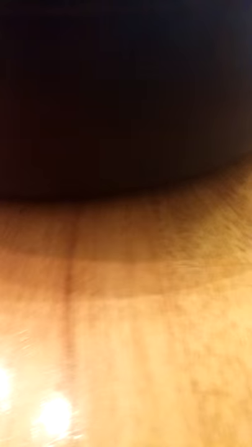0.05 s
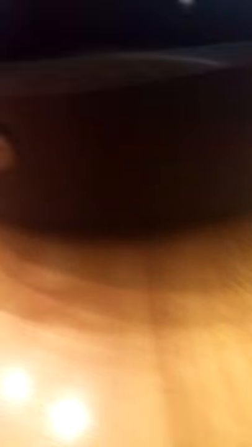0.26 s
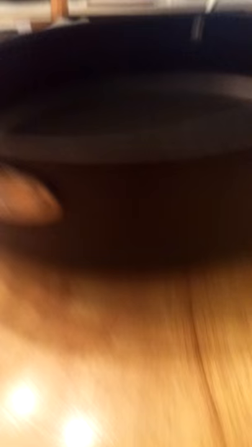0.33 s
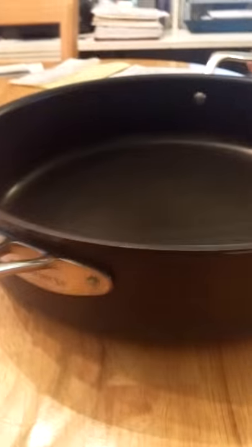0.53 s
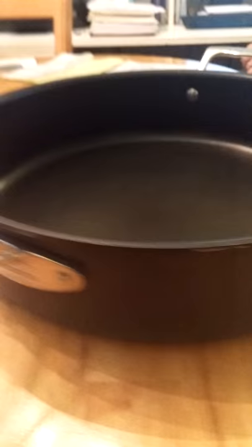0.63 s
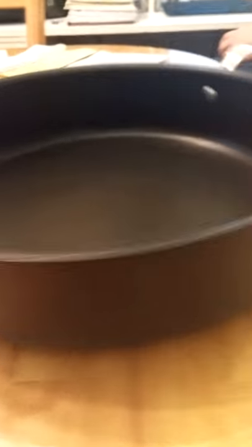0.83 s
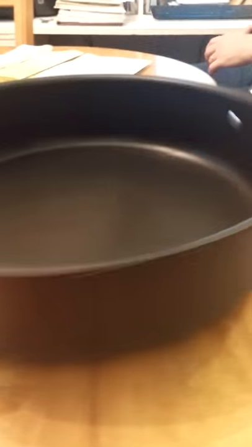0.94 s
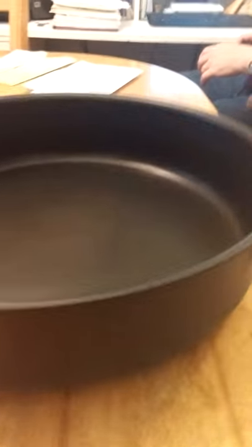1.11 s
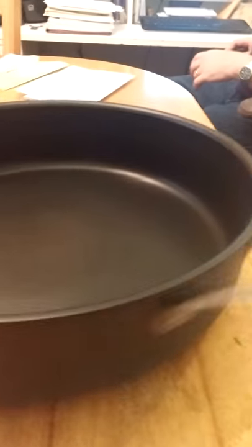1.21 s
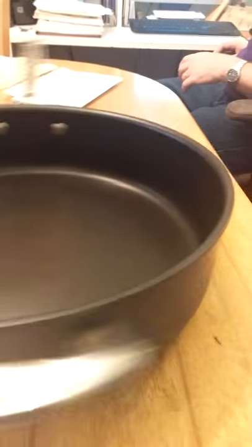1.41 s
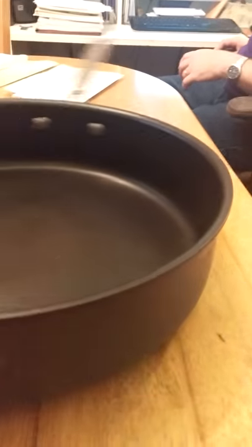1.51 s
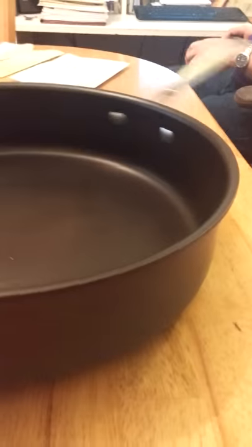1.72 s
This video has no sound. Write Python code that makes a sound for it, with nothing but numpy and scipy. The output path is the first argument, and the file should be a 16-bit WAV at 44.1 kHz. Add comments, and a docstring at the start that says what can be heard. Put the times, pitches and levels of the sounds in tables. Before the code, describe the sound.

Close up in a small room, a metal pan clunks against a wooden tabletop three times, its edge hitting and its base clapping flat. Then it is dragged round with a hissing rasp, a brief judder and faint metallic squeaks.

```python
"""Frying pan on a wooden table

A heavy pan rocks on a table in a small room, close to a stereo microphone. Three times its edge
knocks the wood and the base then claps down flat with a hollow ring, shaking the table top.
Then it is turned: the base scrapes over the grain in countless tiny catches and judders on the way."""
import sys
import numpy as np
from scipy import signal
from scipy.fft import rfft, irfft
from scipy.io import wavfile
from scipy.ndimage import uniform_filter1d, map_coordinates

SR = 44100
rng = np.random.default_rng(int(sys.argv[2]) if len(sys.argv) > 2 else 0)


def unload_audio(sound):
    """Save the sound as a 16-bit wav file, at the path given as the first command line argument."""
    columns = np.transpose(np.atleast_2d(sound))
    # keep every value between -1 and 1, then stretch to whole-number steps
    steps = np.round(np.clip(columns, -1, 1) * 32767)
    wavfile.write(sys.argv[1], SR, steps.astype(np.int16))


N = 77175
TIME = np.arange(N) / SR
FREQS = np.arange(N // 2 + 1) * SR / N


def undb(db):
    """Decibels to gain."""
    return 10 ** (np.asarray(db) / 20)


def unit(x):
    """Scale to rms 1."""
    return x / np.sqrt(np.mean(x ** 2))


def at_hz(table, hz, column=1):
    """Read a column of a table along log frequency."""
    rows = np.array(table, float)
    return np.interp(np.log(hz + 1e-9), np.log(rows[:, 0]), rows[:, column])


def at_time(table, column=1):
    """Read a column of a table along time."""
    rows = np.array(table, float)
    return np.interp(TIME, rows[:, 0], rows[:, column])


def colour(x, table):
    """Filter by (Hz, dB) points."""
    return irfft(rfft(x) * undb(at_hz(table, FREQS)), N)


def balance(db):
    """Channel gains for a balance, which is left minus right in dB."""
    return undb(np.array([[1], [-1]]) * db / 2)


def stereo_pair(noises, likeness):
    """Mix two unrelated noises into left and right of a given likeness per frequency."""
    mid, side = rfft(noises)
    alike = np.clip(likeness, 0, 1)
    return irfft(mid * np.sqrt((1 + alike) / 2) + side * np.sqrt((1 - alike) / 2) * [[1], [-1]], N)


def through(x, response):
    """Convolve with an impulse response."""
    return signal.fftconvolve(np.atleast_2d(x), np.atleast_2d(response), axes=1)[:, :N]


def fade(t60, start=0):
    """Exponential decay from a start time."""
    age = TIME - start
    return (age >= 0) * np.exp(-np.log(1000) * np.abs(age) / t60)


def swell(centre, width):
    """Bell-shaped envelope."""
    return np.exp(-((TIME - centre) / width) ** 2 / 2)


def wander(hz):
    """Smooth random motion of rms 1."""
    hold = max(int(SR / hz), 2)
    return unit(uniform_filter1d(rng.standard_normal(N)[np.arange(N) // hold], hold))


def ring(modes):
    """Impulse response of a set of damped modes."""
    return sum(balance(lr) * undb(db) * fade(t60) * np.sin(2 * np.pi * hz * TIME)
               for hz, db, t60, lr in modes)


def pushes(contacts):
    """One smooth force pulse per contact; a longer contact is duller."""
    force = np.zeros(N)
    for start, db, ms in contacts:
        age = np.maximum(TIME - start, 0) / (ms / 1000 / 2)
        pulse = age * np.exp(-age)
        force += undb(db) * pulse / pulse.sum()
    return force


def radiate(x, low_hz):
    """A small surface radiates its lows poorly."""
    return signal.sosfilt(signal.butter(2, low_hz, "high", fs=SR, output="sos"), x)


# The quiet of the room. Each row: frequency in Hz, relative level in dB.
ROOM_TONE = [(25, -14), (68, -4.5), (110, -5), (200, -3), (600, -12.5), (1500, -16.5), (3000, -25),
             (10000, -21), (13000, -26), (16000, -42)]
def room_tone():
    """A faint, low wash of noise all around the microphone."""
    noise = stereo_pair(rng.standard_normal((2, N)), at_hz(ROOM, FREQS, column=3))
    return undb(-62.5) * unit(colour(noise, ROOM_TONE))


# The small room. Each row: frequency in Hz, tail gain in dB, t60 in seconds, channel likeness 0-1.
ROOM = [(60, -14.5, .5, 0.5), (173, -11.5, 0.81, 1), (290, 5.5, 0.33, 0.7), (450, -5.5, 0.3, .5),
        (715, -7.5, 0.26, 1), (1500, -6.5, 0.34, 0), (4000, -1, 0.36, 0.7), (12000, -11, 0.66, 0)]
def reverb(x):
    """Quick reflections from nearby things, then a short tail in half-octave bands."""
    noise = rfft(stereo_pair(rng.standard_normal((2, N)), at_hz(ROOM, FREQS, column=3)))
    first_echo_s = 0.002
    early = fade(0.022, first_echo_s)
    early = undb(-13) * early / np.linalg.norm(early)
    response = 0
    for centre in 44 * 2. ** (np.arange(18) / 2):
        octaves_off = np.abs(np.log2((FREQS + 1e-9) / centre))
        band = irfft(noise * np.maximum(1 - 2 * octaves_off, 0), N)
        tail = fade(at_hz(ROOM, centre, column=2), first_echo_s)
        response += band * undb(at_hz(ROOM, centre)) * np.hypot(tail / np.linalg.norm(tail), early)
    return through(x, response)


# The nearest walls. Each row: delay in seconds, gain in dB, balance in dB.
WALLS = [(.0095, -20, -7.5), (0.0204, -9.5, 9)]
def wall_echoes(x):
    """Distinct reflections that have lost their treble."""
    dull = signal.sosfilt(signal.butter(2, 607, fs=SR, output="sos"), x)
    return sum(balance(lr) * undb(db) * [np.interp(TIME - delay, TIME, side, left=0) for side in dull]
               for delay, db, lr in WALLS)


# The pan's lean at the microphone. Each row: frequency in Hz, balance in dB.
TREBLE_BALANCE = [(500, -2), (1000, -4), (1800, -7.5), (2500, -6.5), (3300, 2.5), (4000, 0), (4900, -6),
                  (7000, -7.5), (10200, -10.5), (13000, 2.5)]
def lean_right(x):
    """The right side hears more of the treble."""
    return irfft(rfft(x) * balance(at_hz(TREBLE_BALANCE, FREQS)), N)


# The pan's resonances under friction. Each row: frequency in Hz, width in Hz, gain in dB.
PAN_RESONANCES = [(634, 39, 5.5), (1044, 70, 0), (1300, 160, 1), (1514, 53, 4), (2118, 61, 5.5),
                  (2876, 104, 1.5), (5520, 180, -2), (6580, 63, 4), (9970, 160, 4)]
# Stereo width of the friction. Each row: frequency in Hz, channel likeness 0-1.
FRICTION_LIKENESS = [(200, 0.91), (700, 0.63), (2000, 0.62), (4000, 0.31), (10000, 0.19)]
def friction(tone, grains_per_s=7000, spread_db=0.5):
    """Dense tiny catches of metal on wood, heard through the pan's resonances."""
    hits = rng.random((2, N)) < grains_per_s / SR
    grains = hits * rng.standard_normal((2, N)) * undb(spread_db * rng.exponential(size=(2, N)))
    hz = FREQS + 1e-9
    grains = stereo_pair(grains, at_hz(FRICTION_LIKENESS, hz))
    body = 1 + sum(undb(db) / (1 + 1j * (hz ** 2 - centre ** 2) / (hz * width))
                   for centre, width, db in PAN_RESONANCES)
    sound = lean_right(colour(irfft(rfft(grains) * body, N), tone))
    return sound / np.std(sound.mean(axis=0))


# The rim between the knocks. Each row: time in seconds, level in dB.
ROLL_LEVEL = [(0.0, -47), (0.06, -58.5), (0.183, -62.5), (0.196, -26), (0.24, -27.5), (0.28, -27),
              (0.36, -27.5), (0.45, -37.5), (0.48, -35), (0.66, -36), (0.76, -29.5), (0.86, -52.5),
              (1.0, -72)]
# Its rumble. Each row: frequency in Hz, relative level in dB.
ROLL_COLOUR = [(30, -39.5), (65, -2.5), (110, 7.5), (180, -1.5), (320, 1.5), (560, -11), (900, -20),
               (2000, -27.5), (4000, -53.5)]
def rolling():
    """The tilted rim rolls over the wood with a soft rumble."""
    return friction(ROLL_COLOUR) * undb(at_time(ROLL_LEVEL))


# Low shudders of the table: two faint hums at the start, then one clear and one faint judder
# as the pan turns. Each row: centre in seconds, width in seconds, level in dB.
SHUDDERS = [(0.012, .018, -43.5), (0.115, .025, -55.5), (1.171, 0.027, -29), (1.32, 0.034, -54)]
# Their low buzz. Each row: frequency in Hz, relative level in dB.
SHUDDER_COLOUR = [(30, -15), (68, 1.5), (135, -10.5), (220, -14.5), (320, -15), (600, -47), (1500, -59)]
def shudders(pulse_hz=66.3):
    """The table hums briefly at the start; in the turn, the base sticks and slips and shakes it."""
    cycles = np.floor(np.cumsum(pulse_hz * (1 + 0.065 * wander(38))) / SR)
    pulses = np.diff(cycles, prepend=0) * undb(2 * wander(90))
    envelope = sum(undb(db) * swell(centre, width) for centre, width, db in SHUDDERS)
    return envelope * unit(colour(pulses - pulses.mean(), SHUDDER_COLOUR))


# Catches, off to the right. Each row: centre and width in seconds, pitch in Hz, level in dB.
CATCHES = [(0.928, 0.013, 2122, -41.5), (1.087, 0.0057, 2120, -37.5), (1.123, 0.0043, 2060, -34),
           (1.271, 0.018, 1530, -34), (1.258, .015, 2095, -33.5), (1.301, 0.036, 2263, -35.5),
           (1.54, 0.011, 2080, -31.5), (1.546, 0.016, 2812, -32)]
def singing(waver_hz=33.46):
    """Each catch of the base sets one resonance singing: a short, wavering metallic tone."""
    tones = np.zeros(N)
    for centre, width, hz, db in CATCHES:
        phase = 2 * np.pi * np.cumsum(hz + waver_hz * wander(300)) / SR
        tones += undb(db) * swell(centre, width) * np.sqrt(2) * np.sin(phase)
    return balance(-8) * tones


# The turn, close up. Each row: time in seconds, then relative levels of hiss, rasp and rub in dB.
TURN = [(0.84, -69, -66, -63), (0.862, -61.5, -56.5, -42.5), (0.938, -38, -35.5, -46),
        (1.018, -37.5, -42.5, -41), (1.092, -40.5, -41, -47), (1.11, -50.5, -55.5, -54),
        (1.122, -39.5, -38.5, -50), (1.202, -41, -39.5, -44), (1.296, -38.5, -33.5, -50),
        (1.348, -37, -36.5, -55), (1.376, -41.5, -37.5, -70), (1.404, -39, -31.5, -58),
        (1.504, -42, -30, -50), (1.534, -36, -30, -63), (1.59, -37, -32, -53), (1.658, -45, -37.5, -56),
        (1.684, -38, -39, -74), (1.75, -40.5, -41, -102)]
# A coarser hiss joins as the pan speeds up. Each row: time in seconds, level in dB.
GRIND_LEVEL = [(1.2, -65), (1.27, -35), (1.32, -34), (1.37, -38), (1.54, -34), (1.62, -40), (1.75, -37)]
# The hiss swings across the microphone. Each row: time in seconds, balance in dB.
SWING = [(0.85, -4.5), (1.2, -0.5), (1.33, -5), (1.5, -4), (1.56, 1.5), (1.65, -2.5), (1.72, -2)]
# Slips during the rocking. Each row: start in seconds, level in dB, t60 in seconds.
SLIPS = [(0.0, -64, 0.17), (0.046, -54.5, 0.031), (0.123, -59.5, 0.051), (0.19, -48.5, 0.35),
         (0.282, -43.5, 0.056), (0.384, -57, .2), (0.415, -55.5, 0.087), (0.665, -74, .1)]
# The scrape's four colours, bright to dark. Each row: frequency in Hz, relative level in dB.
HISS_COLOUR = [(100, -46.5), (2000, -19.5), (3300, 8.5), (4200, -4), (5600, 3), (6700, -0.5), (8200, 0),
               (10200, -2.5), (11400, -3.5), (12500, -12.5), (15500, -25.5)]
GRIND_COLOUR = [(100, -48), (2000, -10), (2900, 2), (3600, 1), (4700, 5.5), (5500, -8), (7500, -31)]
RASP_COLOUR = [(60, -47), (400, -18.5), (800, -11), (1050, -4.5), (1400, -8.5), (1800, 1), (2200, -2),
               (2600, -2), (3300, -12), (4200, -7.5), (7000, -50)]
RUB_COLOUR = [(40, -5), (110, -2), (150, 0.5), (190, -4.5), (280, 0.5), (450, -4.5), (700, -5),
              (1000, -6.5), (2000, -31)]
def scraping():
    """The base slips as it rocks, then is dragged round with an uneven grip."""
    turning = np.clip((TIME - TURN[0][0]) / 0.0067 + 1, 0, 1)
    hiss = friction(HISS_COLOUR) * undb(at_time(TURN, column=1) - 1)
    grind = friction(GRIND_COLOUR) * undb(at_time(GRIND_LEVEL)) * (TIME > GRIND_LEVEL[0][0])
    rasp = friction(RASP_COLOUR) * undb(at_time(TURN, column=2) + 1.5)
    rub = friction(RUB_COLOUR) * undb(at_time(TURN, column=3) + 2)
    slips = friction(HISS_COLOUR) * sum(undb(db) * fade(t60, start) for start, db, t60 in SLIPS)
    drag = turning * ((hiss + grind) * balance(at_time(SWING)) + rasp + rub)
    flutter = undb(wander(70.05))
    return (drag + slips) * flutter


# The whole table flexing. Each row: frequency in Hz, gain in dB, t60 in seconds, balance in dB.
FLEX_MODES = [(64.6, -43.5, .7, -4), (106.3, -19.5, 0.21, 2), (119.1, -20, 0.34, -1.5)]
def thud(delay_s=0.0053):
    """The table gives, mostly when the full weight of the pan comes down."""
    weight = pushes([(start + delay_s, db, ms) for start, db, ms in CLAPS])
    load = weight + undb(-8.5) * pushes(KNOCKS)
    return radiate(through(load, ring(FLEX_MODES)), low_hz=75)


# The dry crack of metal on wood. Each row: frequency in Hz, relative level in dB.
CRACK_COLOUR = [(200, 3.5), (800, 18), (2000, 3.5), (3200, -5), (4200, -16), (7000, -19), (10500, -17),
                (13000, -35.5), (16000, -42.5)]
def cracks(hard_contact_ms=0.2):
    """Each contact snaps, then splutters briefly; the shorter the contact, the louder its crack."""
    envelope = np.zeros(N)
    for contacts, trim_db in (KNOCKS, 0), (CLAPS, -11.5):
        for start, db, ms in contacts:
            onset = start + 2 * ms / 1000
            snap, splutter = undb(7.5) * fade(0.01, onset), fade(0.18, onset)
            envelope += undb(db + trim_db) * (snap + splutter) * (hard_contact_ms / ms) ** 2
    noise = unit(lean_right(colour(rng.standard_normal((2, N)), CRACK_COLOUR)))
    return undb(-23) * envelope * noise


# Right by the microphone, the edge knocks and the base claps flat.
# Each row: start in seconds, relative level in dB, contact time in milliseconds.
KNOCKS = [(0.0, -35, 0.1), (0.1892, -20.5, 0.32), (0.2063, -4.5, 1), (0.219, -19.5, .3), (0.258, -25.5, .3),
          (0.2845, 3.5, 0.2), (0.374, -22, 0.24), (0.4848, 3, .22), (0.6649, -5.5, .42)]
CLAPS = [(0.3181, -0.5, 0.14), (0.5183, 0, 0.23), (0.6800, -4, 0.25)]
# What rings: the pan's edge, its base over a cushion of air, and the table top.
# Each row: frequency in Hz, gain in dB, t60 in seconds, balance in dB.
EDGE_MODES = [(302, -21.5, .06, -5), (434, -17.5, 0.036, 3), (590, 3.5, 0.0086, 1.5),
              (826, -16, 0.017, -6.5), (968, -10, 0.026, -9), (1204, -22, 0.072, -2),
              (1620, -9, 0.025, -8.5), (2161, -13, 0.033, -5), (3130, -19, 0.027, -7)]
BASE_MODES = [(503.4, -14, .11, -3), (598.5, -2.5, 0.045, -3.5), (603.6, -10, 0.17, 0.5),
              (662, -3, 0.025, 1.5), (727, -18, 0.041, 2.5), (790.5, -30, 0.13, -12),
              (1039, -25.5, 0.083, -10), (1594, -17.5, 0.043, -9), (1690, -20, 0.11, 0),
              (2150, -23.5, 0.038, -3.5)]
TABLE_MODES = [(220.3, -30, 0.78, 0.5), (276.6, -30, 0.27, -4.5), (312.4, -28, .36, 4),
               (351.6, -30.5, 0.23, -11), (404, -26, 0.28, 6), (467, -30, 0.21, 3)]
def rocking():
    """Edge knocks and flat claps ring the pan and the table, each with a crack."""
    knocks, claps = undb(-1) * pushes(KNOCKS), undb(1.5) * pushes(CLAPS)
    edge = through(knocks + undb(-10) * claps, ring(EDGE_MODES))  # the rim also hits as the base lands
    build_up = 1 - np.exp(-TIME / 0.002)  # the air under the base takes a moment to ring
    base = through(claps, ring(BASE_MODES) * build_up)
    table_top = through(knocks + undb(4) * claps, ring(TABLE_MODES))
    return cracks() - radiate(edge + base + table_top, low_hz=280)


def scene(left_lag_s=0.00013):
    """Pan and table up close, the room behind; the left side hears them slightly later."""
    impacts = rocking()
    in_room = impacts + wall_echoes(impacts) + reverb(impacts)
    left, right = in_room + thud() + rolling() + scraping() + singing() + shudders()
    left = map_coordinates(left, [(TIME - left_lag_s) * SR], mode="nearest")
    return np.array([left, right]) + room_tone()


def record(dry):
    """The microphone rounds the loudest peaks and cuts the top."""
    ceiling, top_hz = 0.82, 15700
    rounded = dry / (1 + (dry / ceiling) ** 6) ** (1 / 6)
    return signal.sosfilt(signal.ellip(8, .2, 80, top_hz, fs=SR, output="sos"), rounded)


dry = scene()
out = record(dry)
unload_audio(out)
```